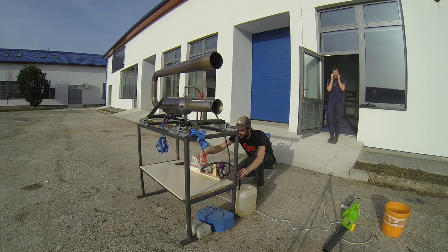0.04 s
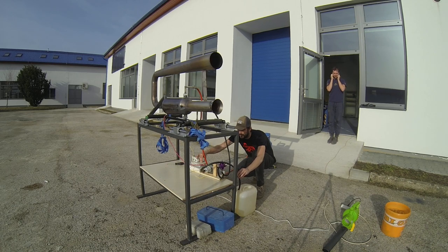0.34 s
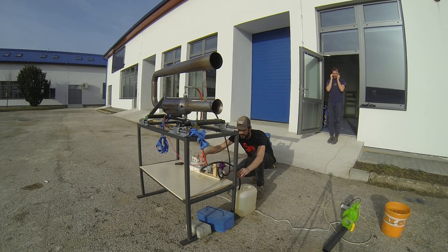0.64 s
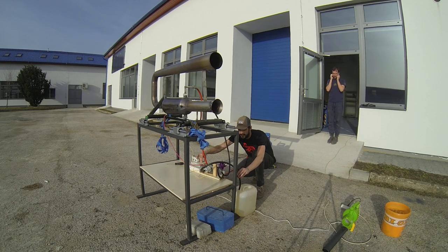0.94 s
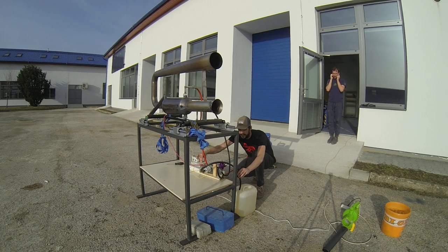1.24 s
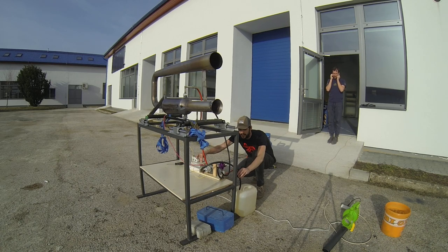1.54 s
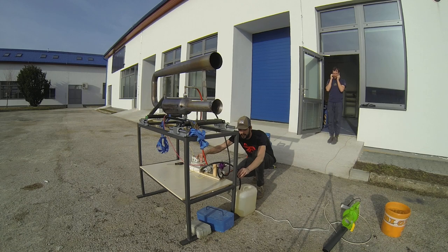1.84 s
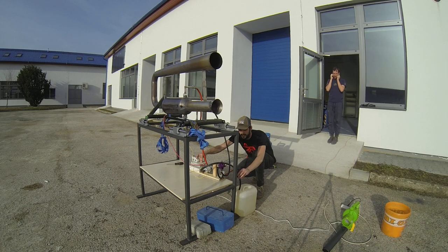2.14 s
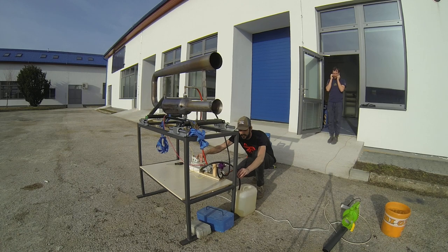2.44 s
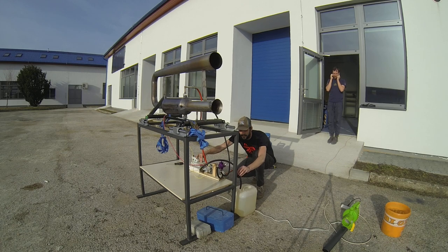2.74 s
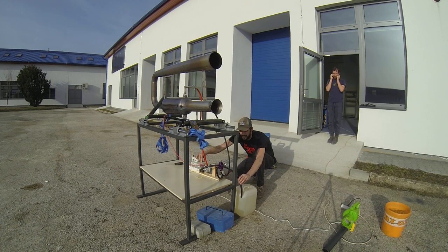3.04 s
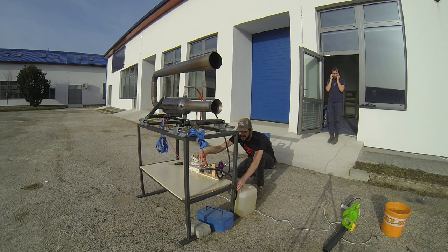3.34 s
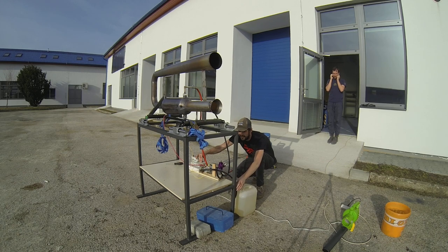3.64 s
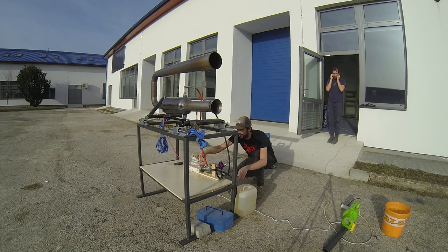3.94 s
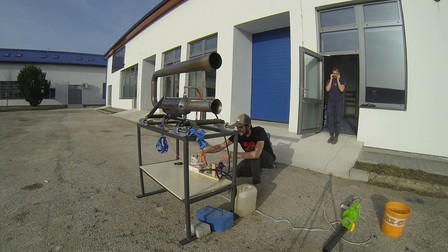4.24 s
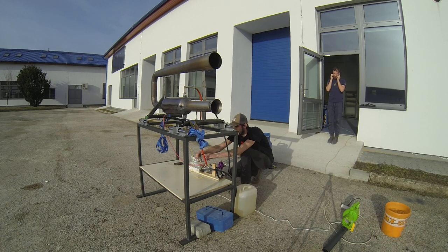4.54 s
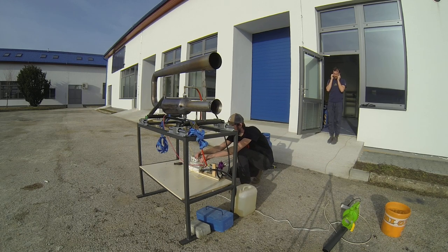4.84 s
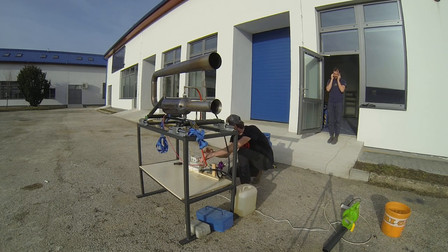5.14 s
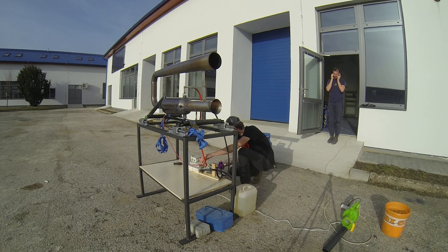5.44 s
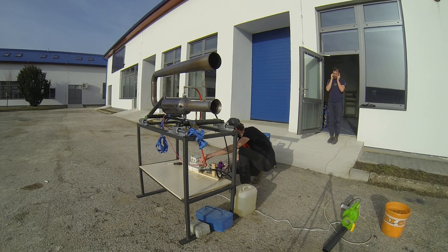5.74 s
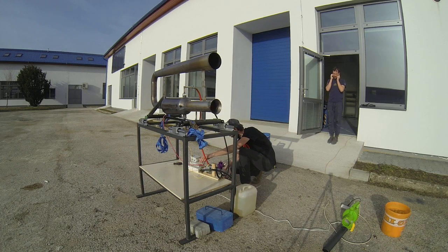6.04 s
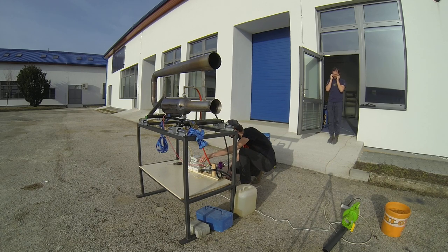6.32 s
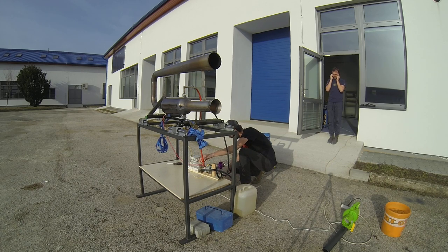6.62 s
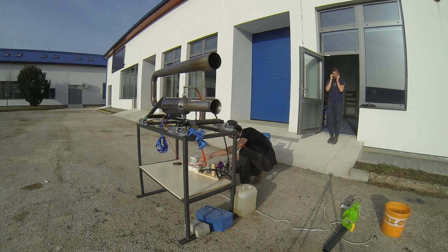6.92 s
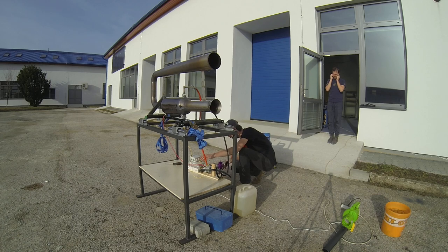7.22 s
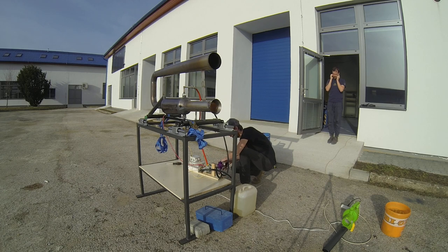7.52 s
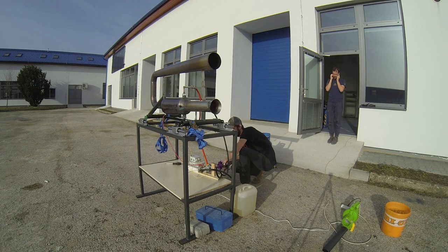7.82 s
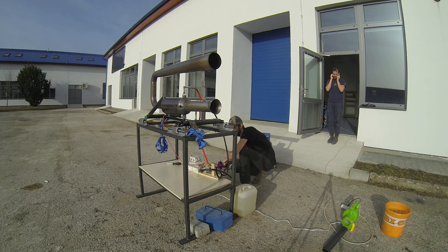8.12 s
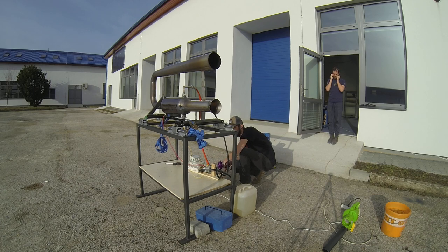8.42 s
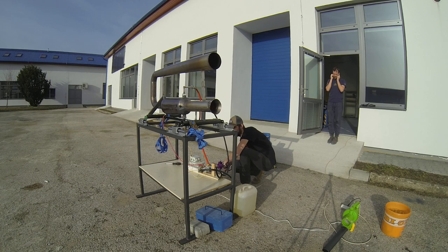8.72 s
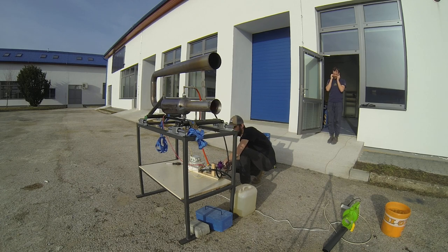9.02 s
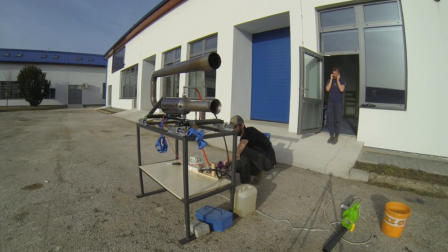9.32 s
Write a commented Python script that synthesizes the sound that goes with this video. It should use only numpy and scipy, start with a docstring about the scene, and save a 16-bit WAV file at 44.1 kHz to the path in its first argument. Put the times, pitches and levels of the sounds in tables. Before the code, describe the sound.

Outdoors, a few metres away, a pulse jet drones with a loud, low, rasping buzz. Exhaust crackle and a metallic ring ride on the roar, which echoes lightly off the yard walls. The pitch creeps up slightly while uneven firings add pops and stutters. Towards the end the engine grows rounder and more ragged, drops out for a split second and picks straight back up.

```python
"""Valveless pulse jet, a few metres off in a paved yard, firing about 88 times a second.
Each cycle: a steep pressure wave, a crackling exhaust burst, a pipe ring and a puff of low roar.
The plume rumbles underneath; walls echo. Firings are uneven, with bangs and misfires.
Late on the burn softens, nearly goes out for a tenth of a second, and catches again."""
import sys
import numpy as np
from scipy import signal
from scipy.io import wavfile
from scipy.ndimage import uniform_filter1d

SR = 44100
rng = np.random.default_rng(int(sys.argv[2]) if len(sys.argv) > 2 else 0)


def persist_wave(psi):
    """Save psi, clipped to +-1, as 16-bit WAV."""
    counts = np.round(np.clip(psi, -1, 1) * 32767).astype(np.int16)
    wavfile.write(sys.argv[1], SR, np.atleast_2d(counts).T)


N = 413216
TIME_S = np.arange(N) / SR

# firing rate, creeping up as the pipe heats: t/s, f/Hz
FIRING_RATE = [(0.0, 86.27), (0.95, 86.37), (1.5, 85.95), (2.8, 87.56), (3.3, 87.56), (4.7, 88.39),
               (5.2, 88.87), (5.85, 88.72), (6.25, 89.3), (6.9, 88.68), (7.7, 89.46), (8.2, 88.57),
               (9.1, 89.24), (9.37, 91.34)]
# burn state: t/s, softness (0 = full shock), burst level/dB, ring level/dB
BURN_STATE = [(0, 0.5, -23, -21.5), (1.1, .6, -24, -22), (2.2, 0.7, -24, -22), (2.8, 1.8, -23, -21),
              (3.3, 1.3, -24.5, -21.5), (3.8, 1.4, -23.5, -21.5), (4.68, 1.5, -23.8, -20.5),
              (5.05, 4.5, -25.5, -20), (5.55, 1.3, -23.5, -20.5), (5.9, 1.5, -26.5, -21),
              (6.27, 2.5, -22.5, -21), (6.8, 2, -25.5, -21), (7.4, 3.5, -24.5, -21.5),
              (7.72, 3.8, -25.3, -21.5), (7.77, 11, -26.8, -22), (8.25, 9, -24, -22), (8.7, 9, -25.5, -21),
              (8.98, 14.5, -28, -23), (9.17, 8.5, -23.3, -19), (9.37, 11, -26.3, -19.5)]
# hard firings, re usual: t/s, blast level/dB, burst level/dB, ring level/dB
BANG_FIRINGS = [(.481, 0, 4, 0), (.634, 0, 4, 5), (1.059, 0, 4, 0), (1.642, 2, 2, 7), (1.932, 1, 5, 8),
                (2.37, 2.5, 5, 5), (2.404, -1, -1, 5), (3.045, 0, 5.5, 5), (3.228, 1.5, 3, 6),
                (3.343, 2, 1, 5), (4.025, 1, 2, 4), (4.117, 1.5, 1, 6), (4.184, 0, 4, 6),
                (4.694, 1.5, 5, 0), (5.023, 2, 3, 7), (5.269, 1.5, 4, 7), (5.439, 2, 5, 3),
                (5.731, 0, 1, 6), (5.912, 3.5, 5, 8), (6.315, 0, 4, 0), (6.924, 3, 6, 0), (7.093, 2, 6, 2),
                (7.519, 2.5, 4, 7), (7.742, 2.5, 6, 7), (7.877, 5, 4, 0), (7.922, 4, 5, 5),
                (7.967, 6, 6, 7), (8.09, 3.5, 4, 3), (8.18, 2.5, 3, 6), (8.327, 1.5, 6, 2),
                (8.362, 3, 3, 5), (8.452, 2.5, 3, 5), (8.497, -1, 2, 2), (8.597, 4, 2, 3), (8.642, 3, 3, 6),
                (8.676, 0, 4, 5), (8.766, 4, 4, 5), (8.834, 1, 2, 3), (8.934, 3, 5, 2), (8.967, 0, 6, 0),
                (9.002, 3, 7, 0), (9.17, 3, 3, 5), (9.203, 3.5, 4, 1), (9.27, 2, 5, 4)]
# firings that barely light, re usual: t/s, blast level/dB
WEAK_FIRINGS = [(.528, -3), (1.096, -4), (1.108, -5), (1.143, -4), (1.689, -4.5), (2.381, -4.5),
                (3.399, -6.5), (4.014, -4.5), (4.196, -3.5), (4.876, -6.5), (5.034, -4), (5.056, -5),
                (5.799, -5), (5.923, -4.5), (6.889, -6), (6.969, -6), (7.394, -6), (7.552, -5.5),
                (7.653, -4), (7.99, -5), (8.305, -6), (8.485, -5), (8.63, -4), (8.8, -5), (8.811, -6),
                (8.912, -6)]
# pressure wave overtones: multiple of the firing rate, relative level/dB
OVERTONES = [(2, 0.9), (3, 0), (4, -9.5), (5, -3.5), (6, -5), (7, -9.5), (8, -19), (9, -20), (10, -17.5),
             (11, -20), (12, -28), (13, -16.5)]
# exhaust turbulence spectrum: f/Hz, relative level/dB
JET_SPECTRUM = [(100, -19.5), (500, -9.5), (900, -4.5), (1700, 2.5), (2100, -3), (3100, -7), (4500, -16),
                (6500, -13.5), (8000, -18.5), (10000, -25), (12000, -30), (14300, -33), (15500, -51)]
# chamber resonances and notches: f/Hz, width/Hz, gain/dB
CHAMBER_PEAKS = [(1156, 52, 6.5), (1408.4, 119, 15), (2073, 250, -4.5), (2253, 116, 7), (2670, 422, 11.5),
                 (2984, 104, -10), (3343, 91, 8), (3682, 270, 10.5), (3946, 200, 9), (4780, 95, -9.5),
                 (5260, 670, 10), (5860, 110, -2.5), (6250, 260, 3.5), (6500, 180, -7), (6890, 200, 2),
                 (7160, 400, -3), (7890, 560, 4), (9140, 250, -0.5), (9550, 300, 1.5), (13100, 260, -7)]
# pipe cross modes: f/Hz, relative level/dB, lead on the front/s, rise/s, decay/s, gain per softness/dB
PIPE_MODES = [(1406.7, 0.5, 0.0018, 0.0041, 0.0035, 0), (2713, -14.5, .0041, 0.0012, 0.0021, 0.35)]
# wall echoes: delay/s, relative level/dB
WALL_ECHOES = [(0.0171, -17.5), (0.02, -23), (0.0294, -30), (.047, -25), (0.082, -15.5)]
# plume puffs, plume rumble, yard response: f/Hz, level/dB
ROAR_SPECTRUM = [(30, -38), (130, -13), (200, 8), (350, -13.5), (520, 2), (950, -2), (1300, -17),
                 (2200, -6.5), (6000, -58)]
RUMBLE_SPECTRUM = [(15, -22), (50, -16), (130, -8), (200, -10), (350, -1), (520, 0), (1150, -11),
                   (2000, -26), (6000, -43)]
YARD_SPECTRUM = [(100, -5), (500, -4.5), (3000, -7), (12000, -7.5)]

ADVANCE_CYCLES = .009  # burst and ring come earlier, per unit softness


def gain_of(db):
    """dB to amplitude factor."""
    return 10 ** (np.asarray(db) / 20)


def unit_rms(x):
    """Scale to rms 1."""
    return x / np.sqrt(np.mean(x ** 2) + 1e-20)


def follow(rows, t_s):
    """Table columns interpolated at t_s."""
    times_s, *columns = np.transpose(rows)
    return [np.interp(t_s, times_s, column) for column in columns]


def colour(x, spectrum, peaks=()):
    """Minimum-phase filter: spectrum plus Gaussian peaks and notches."""
    hz = np.fft.rfftfreq(4096, 1 / SR)
    points_hz, points_db = np.transpose(spectrum)
    db = np.interp(np.log(hz + 1), np.log(points_hz), points_db)
    for centre_hz, width_hz, height_db in peaks:
        db += height_db * .5 ** ((2 * (hz - centre_hz) / width_hz) ** 2)
    log_gain = np.log(gain_of(np.r_[db, db[-2:0:-1]]))
    taps = np.fft.ifft(np.exp(np.conj(signal.hilbert(log_gain)))).real
    return signal.oaconvolve(x, taps[:len(hz)])[:N]


def per_firing(values, cycles, glide_cycles=.32):
    """One value per firing, gliding to the next in the lull between fronts."""
    firing, age = np.divmod(cycles, 1)
    glide = np.clip((age - .5) / glide_cycles + .5, 0, 1)
    return np.interp(firing + glide, np.arange(len(values)), values)


def steady_cycles():
    """Running cycle count of the air column, without jitter."""
    return .37 + np.cumsum(follow(FIRING_RATE, TIME_S)[0]) / SR


def flame_db(dip_s=9.014, fall_s=.008, hold_s=.08, relight_s=.032):
    """Flame level: full but for one near flameout."""
    corners_s = dip_s + np.cumsum([0, fall_s, hold_s, relight_s])
    return np.interp(TIME_S, corners_s, [0, -14, -15, 0])


def softness():
    """Slump of the front from a full shock; a starved flame adds to it."""
    return follow(BURN_STATE, TIME_S)[0] - .33 * flame_db()


def firings(jitter_cycles=.011, wander_cycles=.01, sputter_db=.3):
    """Uneven ignition: cycle count per sample; time and blast, burst and ring levels per firing."""
    cycles = steady_cycles()
    index = np.arange(int(cycles[-1]) + 2)
    early, blast_draw, burst_draw, ring_draw, drift = rng.standard_normal((len(index), 5)).T
    cycles += np.interp(cycles, index, signal.lfilter([1], [1, -.8], wander_cycles * drift))
    # a soft burn ignites less evenly and sputters
    cycles += (jitter_cycles + .001 * softness()) * np.interp(cycles, index, early)
    fire_s = np.interp(index, cycles, TIME_S)
    soft = np.interp(fire_s, TIME_S, softness())
    blast_db = (1 + .11 * soft) * blast_draw
    burst_db = .96 * blast_db + (1.1 + sputter_db * soft) * np.minimum(burst_draw, 1)
    ring_db = .5 * blast_db + 20 * np.log10(np.clip(1 + .31 * ring_draw, .25, 1.6))
    for t_s, *levels_db in BANG_FIRINGS:
        k = np.argmin(abs(fire_s - t_s))
        blast_db[k], burst_db[k], ring_db[k] = levels_db
        burst_db[k - 1], ring_db[k - 1] = 1.5, -4.5  # previous firing burns lean, leaves fuel
        blast_db[k + 1] -= 1.5  # next finds less fuel
    for t_s, db in WEAK_FIRINGS:
        k = np.argmin(abs(fire_s - t_s))
        blast_db[k], burst_db[k], ring_db[k] = db, 1.4 * db, .85 * db
    return cycles, fire_s, blast_db, burst_db, ring_db


def pressure_wave(cycles, fire_s, blast_db, gain_db=-20.5, memory=.51, sway=.66, slump_db=1.29):
    """Sawtooth of suction and blast; harder firings steepen the front towards a shock."""
    soft = softness()
    # the air column carries the fundamental through weak firings and recovers slowly
    stored = signal.lfilter([1], [1, -memory], np.minimum(blast_db, 1.5))
    stored = uniform_filter1d(np.interp(TIME_S, fire_s, stored), SR // 88)
    column_db = .96 * stored / (1 + .045 * soft)
    steady = steady_cycles()
    column_cycles = steady + sway * (cycles - steady)
    wave = gain_of(2 + column_db) * np.sin(2 * np.pi * column_cycles)
    front_db = 1.56 * per_firing(blast_db, cycles)
    choke_db = .5 * flame_db()  # overtones need the flame
    for k, db in OVERTONES:
        rounding_db = slump_db * soft * np.clip((k - 1.8) / 2.3, 0, 1)
        front_share = np.clip((k - 1.9) / 2.3, 0, 1)  # high overtones follow the single firing
        push_db = front_share * front_db + (1 - front_share) * column_db
        phase_cycles = column_cycles + front_share * (cycles - column_cycles)
        wave += gain_of(db + push_db + choke_db - rounding_db) * np.sin(2 * np.pi * k * phase_cycles)
    return gain_of(gain_db + .28 * soft) * wave  # a rounder wave swings wider


def exhaust(cycles, burst_db, lead_cycles=.36, rise_cycles=.14, hold_cycles=.3, fall_cycles=.19,
            idle_db=-18, shocks_per_s=3200, split_hz=6000):
    """Hot gas tears out ahead of each front: many small shocks, brighter in a stronger burn."""
    soft, count = softness(), len(burst_db)
    firing, age = np.divmod(cycles + lead_cycles + ADVANCE_CYCLES * soft, 1)
    firing = np.clip(firing.astype(int), 0, count - 1)
    stretch = np.exp(.16 * rng.standard_normal(count))
    length_cycles = hold_cycles * stretch[firing] * gain_of(-.4 * soft)
    burst = np.minimum(age / rise_cycles, 1) * np.exp(-np.maximum(age - length_cycles, 0) / fall_cycles)
    envelope = burst * gain_of(burst_db)[firing] + gain_of(idle_db)
    onsets = rng.random(N) < shocks_per_s / SR
    shocks = onsets * gain_of(2.5 * np.minimum(rng.exponential(1, N), 4))
    gas = unit_rms(shocks * rng.choice([-1, 1], N)) + .65 * rng.standard_normal(N)
    jet = colour(envelope * gas, JET_SPECTRUM, CHAMBER_PEAKS)
    jet /= signal.sosfilt(signal.butter(4, 2000, "high", fs=SR, output="sos"), jet).std()
    lows = signal.sosfiltfilt(signal.butter(2, split_hz, fs=SR, output="sos"), jet)
    level_db = follow(BURN_STATE, TIME_S)[1] + flame_db()
    spit_db = per_firing(rng.standard_normal(count), cycles)
    treble_db = .11 * (level_db + 24) + spit_db
    return gain_of(level_db) * (lows + (jet - lows) * gain_of(treble_db))


def pipe_ring(fire_s, ring_db, spread_hz=9, spread_rad=1.67):
    """Each blast rings the pipe's cross modes; pitch scatters with gas heat."""
    t_s = np.arange(SR // 60) / SR
    rings = np.zeros(N + len(t_s))
    soft = np.interp(fire_s, TIME_S, softness())
    strikes_s = fire_s - ADVANCE_CYCLES * soft / follow(FIRING_RATE, fire_s)[0]
    for hz, mode_db, lead_s, rise_s, decay_s, soft_gain_db in PIPE_MODES:
        attack = np.sin(np.pi / 2 * np.minimum(t_s / rise_s, 1)) ** 2
        envelope = attack * np.exp(-(np.maximum(t_s - rise_s, 0) / decay_s) ** 1.67)
        for strike_s, strike_db in zip(strikes_s, ring_db + soft_gain_db * soft):
            heat, slip = rng.standard_normal(2)
            start = int(np.clip((strike_s - lead_s) * SR, 0, N))
            tone = np.sin(2 * np.pi * (hz + spread_hz * heat) * t_s + spread_rad * slip)
            rings[start:start + len(t_s)] += gain_of(mode_db + strike_db) * envelope * tone
    return gain_of(follow(BURN_STATE, TIME_S)[2] + .85 * flame_db()) * unit_rms(rings[:N])


def plume(cycles, blast_db, roar_db=-30, rumble_db=-40, lead_cycles=.067):
    """A puff of low roar at each front, over the steady rumble of the hot plume."""
    soft = softness()
    sharpness = 2.1 / (1 + .12 * np.maximum(soft - 3, 0))  # a soft burn smears the puff
    puffs = np.exp(sharpness * (np.cos(2 * np.pi * (cycles + lead_cycles)) - 1))
    puffs *= np.sqrt(sharpness) * gain_of(per_firing(blast_db, cycles))
    roar = colour(puffs * rng.standard_normal(N), ROAR_SPECTRUM)
    rumble = colour(rng.standard_normal(N), RUMBLE_SPECTRUM)
    return gain_of(roar_db - .3 * soft) * unit_rms(roar) + gain_of(rumble_db) * unit_rms(rumble)


def yard(x, tail_db=-23, t60_s=1.0, gap_s=.02):
    """Slaps off nearby walls; a thin, dull tail from the rest of the yard."""
    t_s = np.arange(SR // 2) / SR
    response = rng.standard_normal(len(t_s)) * gain_of(-60 * t_s / t60_s) * (t_s > gap_s)
    response *= gain_of(tail_db) / np.linalg.norm(response)
    for delay_s, db in WALL_ECHOES:
        response[round(delay_s * SR)] += gain_of(db)
    return colour(signal.oaconvolve(x, response)[:N], YARD_SPECTRUM)


def scene():
    """Engine plus echoes, mono."""
    cycles, fire_s, blast_db, burst_db, ring_db = firings()
    engine = pressure_wave(cycles, fire_s, blast_db) + exhaust(cycles, burst_db)
    engine += pipe_ring(fire_s, ring_db) + plume(cycles, blast_db)
    return (engine + yard(engine))[None]


def record(dry, cutoff_hz=15450):
    """Soft clip, then low-pass."""
    rounded = dry / (1 + dry ** 6) ** (1 / 6)
    taps = signal.firwin(255, cutoff_hz, window=("kaiser", 9), fs=SR)
    return signal.oaconvolve(rounded, taps[None], "same")


dry = scene()
out = record(dry)
persist_wave(out)
```